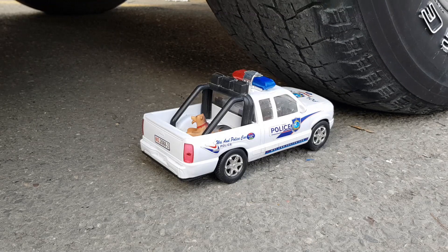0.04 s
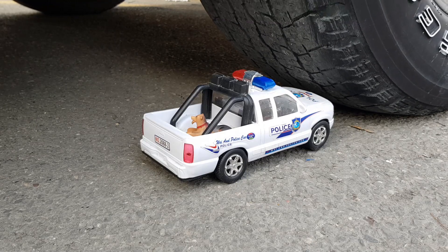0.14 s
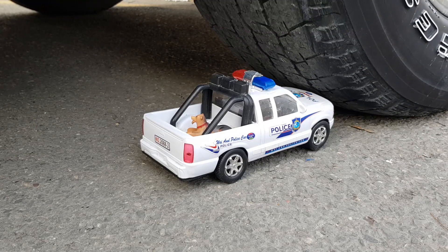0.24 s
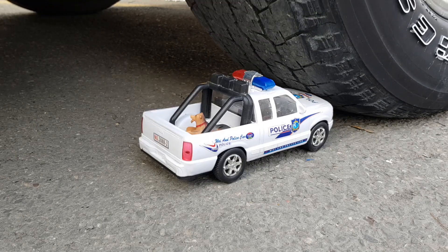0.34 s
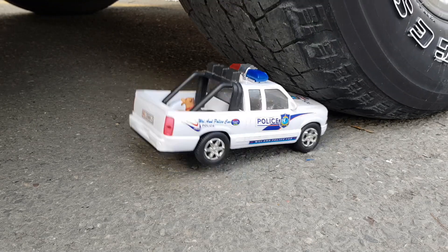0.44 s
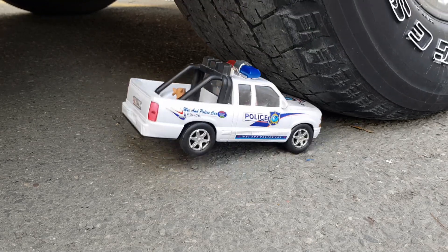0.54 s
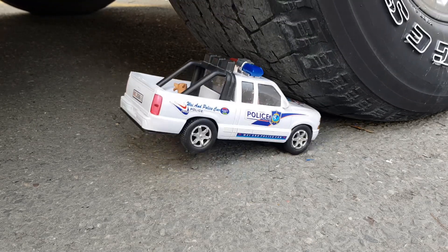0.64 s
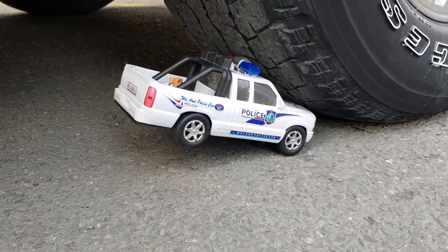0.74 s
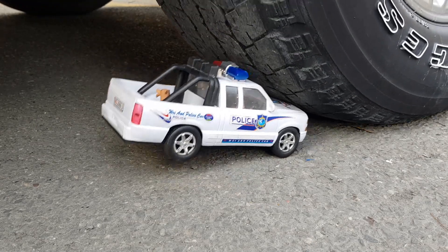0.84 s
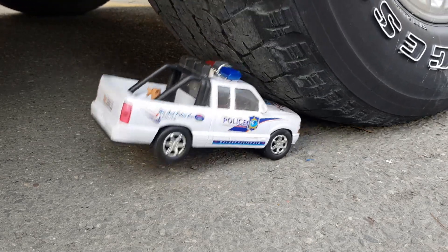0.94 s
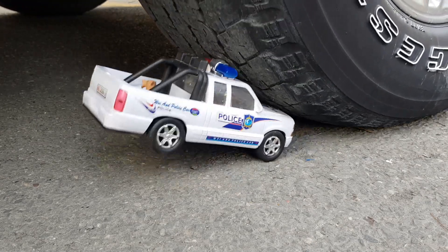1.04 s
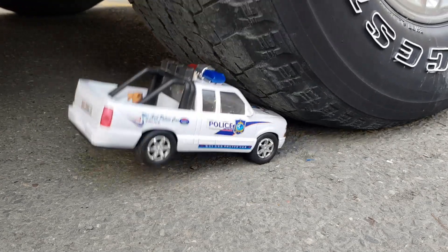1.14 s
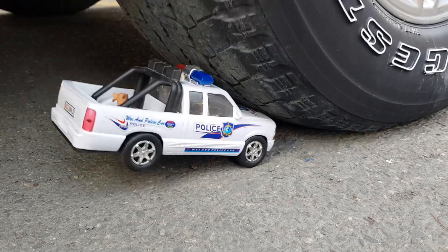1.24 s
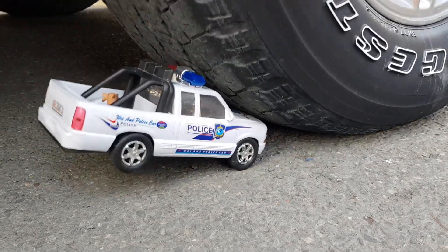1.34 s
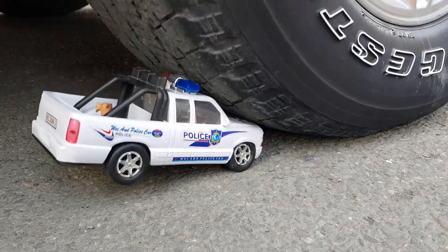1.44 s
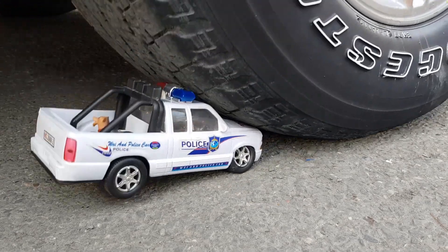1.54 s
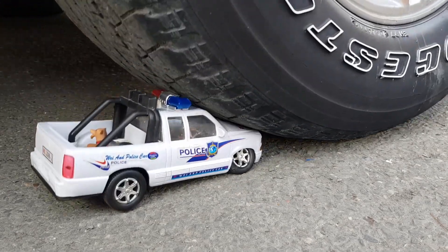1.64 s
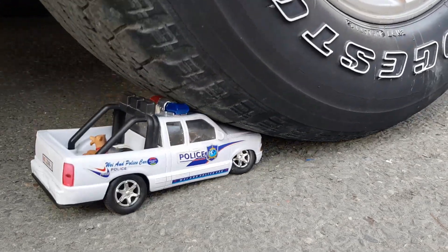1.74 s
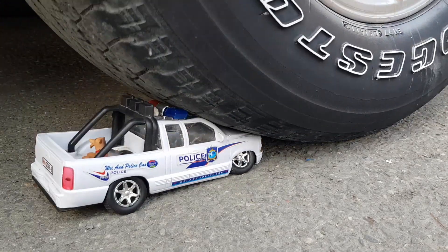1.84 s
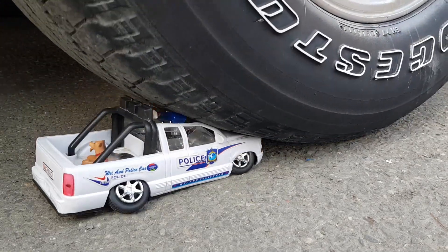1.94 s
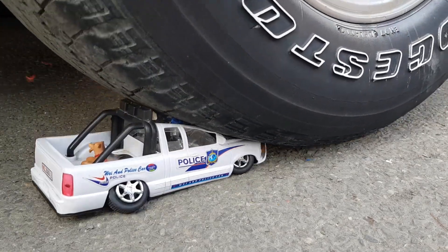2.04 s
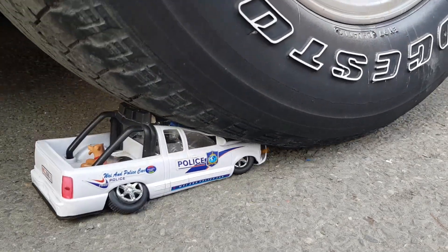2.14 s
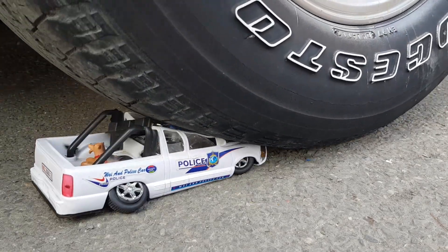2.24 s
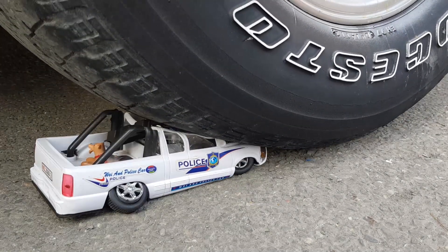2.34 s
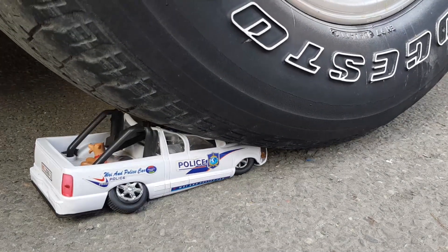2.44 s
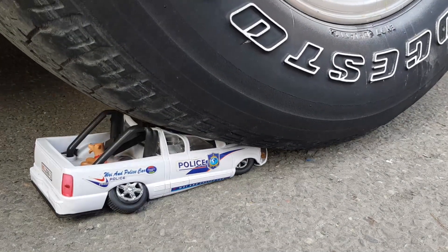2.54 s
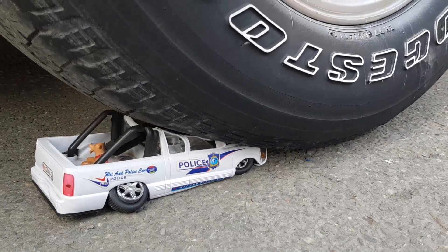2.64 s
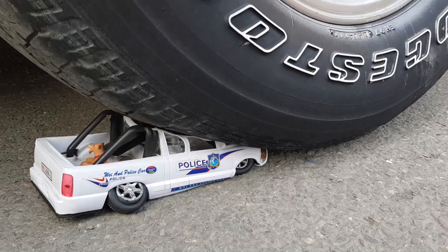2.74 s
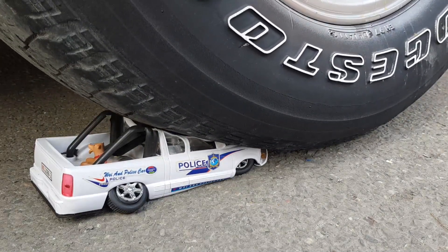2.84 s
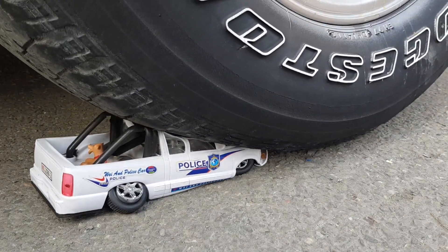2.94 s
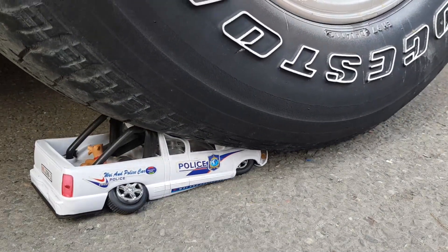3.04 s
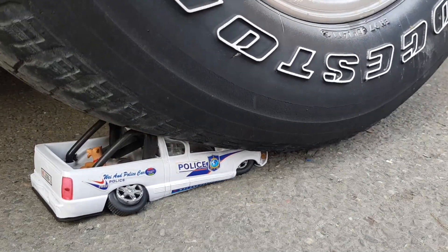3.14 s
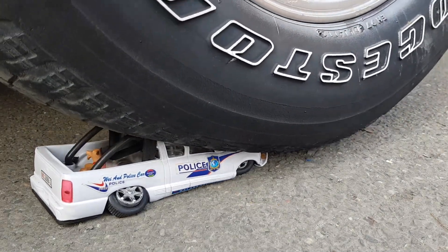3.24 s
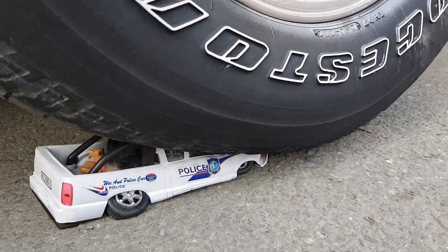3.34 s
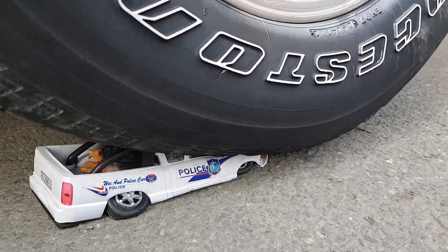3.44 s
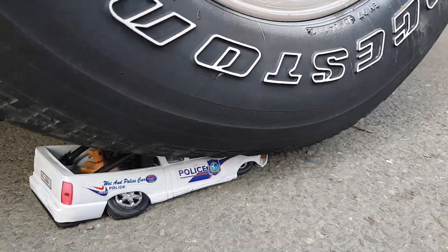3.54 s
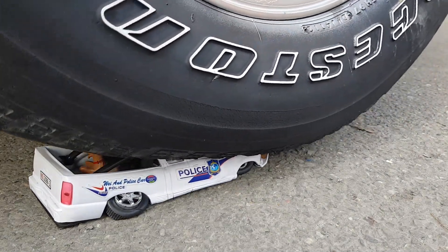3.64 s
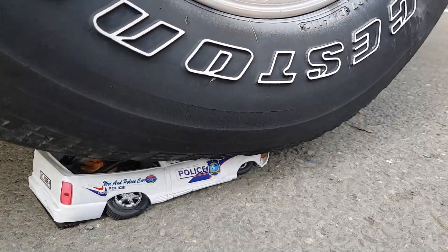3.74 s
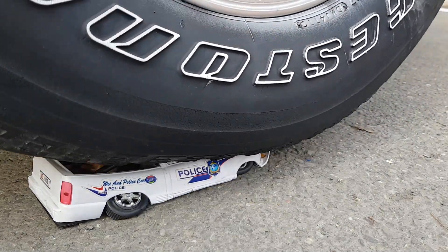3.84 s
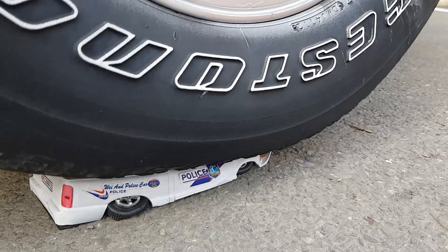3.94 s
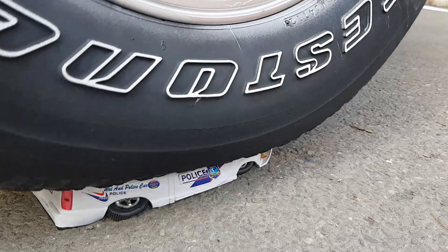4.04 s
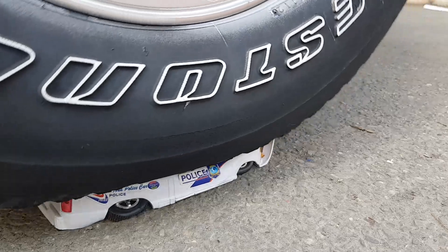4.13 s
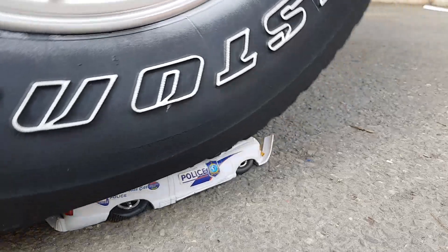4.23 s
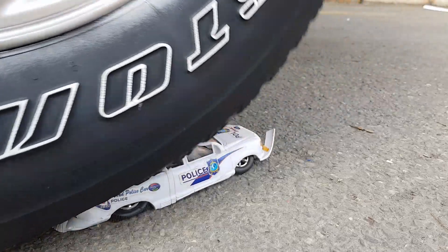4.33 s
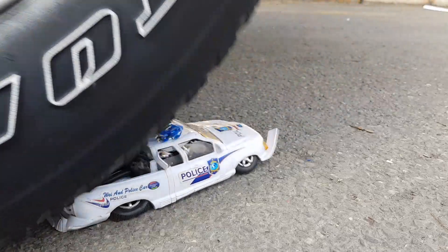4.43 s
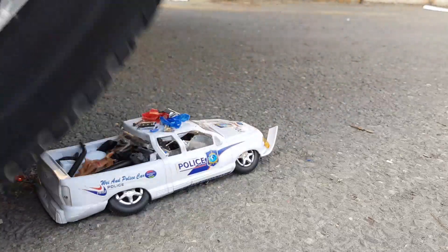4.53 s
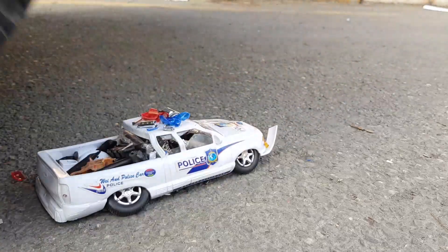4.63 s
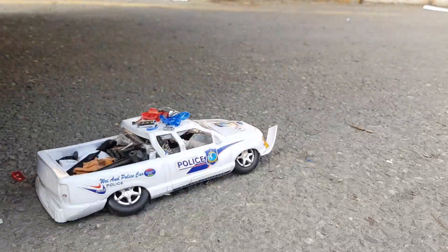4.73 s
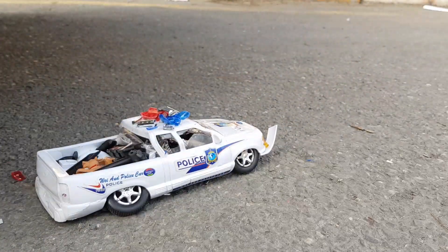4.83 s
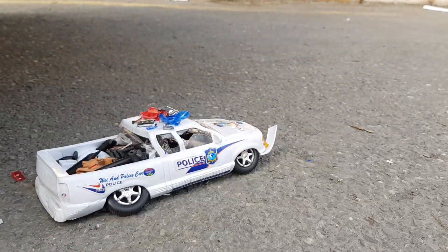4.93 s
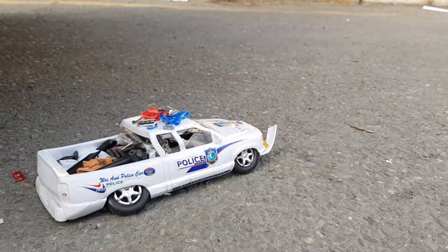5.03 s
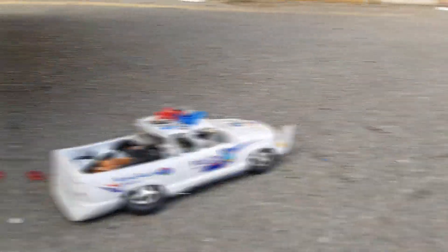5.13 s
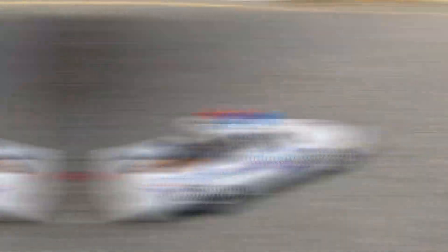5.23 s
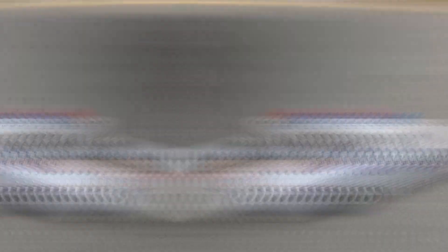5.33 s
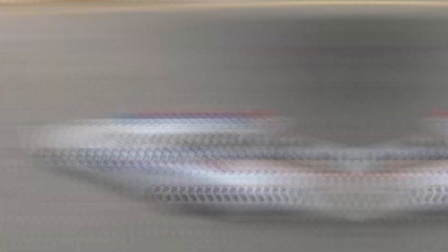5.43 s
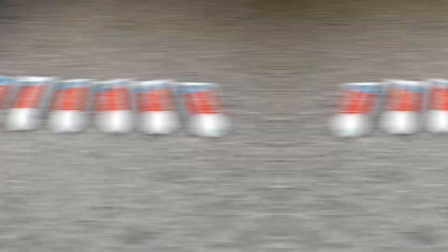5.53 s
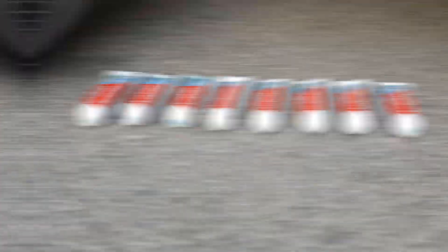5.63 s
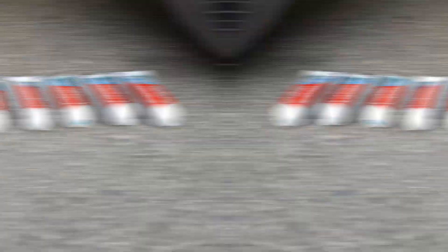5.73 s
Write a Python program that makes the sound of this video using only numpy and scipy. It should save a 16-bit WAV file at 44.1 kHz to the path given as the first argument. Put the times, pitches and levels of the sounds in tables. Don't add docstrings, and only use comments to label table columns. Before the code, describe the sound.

A tyre slowly crushes a hollow plastic toy truck on asphalt, creaking then cracking in sharp snaps over an idling car's rumble.

```python
import sys
import numpy as np
from scipy import signal
from scipy.fft import rfft, irfft, next_fast_len
from scipy.io import wavfile
from scipy.ndimage import uniform_filter1d

SR = 44100
rng = np.random.default_rng(int(sys.argv[2]) if len(sys.argv) > 2 else 0)


def unload_audio(sound):
    columns = np.transpose(np.atleast_2d(sound))
    steps = np.round(np.clip(columns, -1, 1) * 32767)
    wavfile.write(sys.argv[1], SR, steps.astype(np.int16))


def linear_from_db(decibels):
    return 10 ** (np.asarray(decibels, float) / 20)


N = 254752
TIME = np.arange(N) / SR
BREAK = 6000
RUN_UP = 70


def rms_one(x):
    return x / np.sqrt(np.mean(x ** 2) + 1e-20)


def peak_of(x, size):
    return np.sqrt(uniform_filter1d(np.mean(x[:, :500] ** 2, axis=0), size).max())


def at_hz(points, hz):
    point_hz, db = np.transpose(points)
    return np.interp(np.log(np.maximum(hz, 1)), np.log(point_hz), db)


def bins_hz(size):
    return np.arange(size // 2 + 1) * SR / size


def drift(rate):
    r = np.exp(-80 * np.pi * rate / SR)
    slow = signal.lfilter([1], [1, -2 * r, r * r], rng.standard_normal(N // 40 + 2002))[2000:]
    return np.interp(np.arange(N) / 40, np.arange(len(slow)), rms_one(slow))


def resonance(x, hz, width):
    r = np.exp(-np.pi * width / SR)
    poles = [1, -2 * r * np.cos(2 * np.pi * hz / SR), r * r]
    return signal.lfilter([(1 - r * r) / 2, 0, (r * r - 1) / 2], poles, x)


def ring(clicks, hz, t60):
    r, w = linear_from_db(-60 / (t60 * SR)), 2 * np.pi * hz / SR
    return signal.lfilter([0, np.sin(w)], [1, -2 * r * np.cos(w), r * r], clicks + 1e-18)


def strikes(rows):
    out = np.zeros(N)
    for s, db in rows:
        out[round(s * SR)] += linear_from_db(db)
    return out


def coloured(spectrum):
    size = next_fast_len(N)
    white = rfft(rng.standard_normal(size))
    return rms_one(irfft(white * linear_from_db(at_hz(spectrum, bins_hz(size))), size)[:N])


def tones(lines):
    total = np.zeros(N)
    for hz, width, db in lines:
        once = resonance(rng.standard_normal(N), hz, width)
        total += linear_from_db(db) * rms_one(resonance(once, hz, width))
    return total


# start in seconds, snap level in dB,
# shell level in dB, strongest shell mode in Hz, crumbling t60 in seconds.
BONNET = [(1.2235, -48, -25, 1700, 0.039), (1.361, -53, -37, 1820, 0.09), (1.429, -27, -5, 1950, 0.035),
          (1.437, -19, -23, 1800, 0.033), (1.44, -40, -21.5, 644, 0.046), (1.456, -15.5, -13.5, 750, 0.07),
          (1.4663, -13, -19.5, 720, 0.031), (1.479, -35, -21, 690, 0.067),
          (1.526, -37.5, -31.5, 1000, 0.089), (1.5286, -18, -10.5, 1230, 0.053),
          (1.534, -28.5, -22, 1060, 0.11), (1.574, -19.5, -9, 1230, 0.072),
          (1.6499, -20, -11.5, 1060, 0.052), (1.656, -32, -19.5, 1000, .04),
          (1.663, -36, -28.5, 905, 0.089), (1.695, -14.5, -11, 1220, 0.036), (1.712, -22, -5, 1240, 0.027),
          (1.718, -39, -28, 1090, .1), (1.724, -29, -19, 1120, 0.077), (1.743, -18, -17.5, 855, 0.034),
          (1.7884, -12.5, -10.5, 1750, 0.052), (1.8643, -20, -34, 1270, 0.083),
          (1.8734, -15.5, -15, 1240, 0.042), (1.902, -35.5, -46, 940, 0.021),
          (1.915, -14.5, -25, 1230, 0.082), (1.923, -15, -15.5, 1860, 0.078),
          (1.9645, -15, -17, 910, 0.083), (1.9983, -19, -19, 895, 0.037), (2.008, -28, -23, 2120, 0.096),
          (2.0233, -13.5, -11.5, 1370, 0.029), (2.025, -22, -25, 595, 0.02),
          (2.03, -14.5, -11, 1630, 0.081), (2.0505, -16, -30.5, 760, 0.062)]
WINDSCREEN = [(2.0752, -23, -30, 814, 0.055), (2.0856, -17, -9, 420, 0.068),
              (2.0955, -15.5, -15, 905, 0.056), (2.11, -12, -19.5, 1300, 0.056),
              (2.12, -22.5, -38, 1200, 0.027), (2.1797, -13.5, -18, 1500, 0.056),
              (2.1822, -21, -11, 420, 0.023), (2.201, -26.5, -27, 1440, 0.021),
              (2.213, -14, -30.5, 2600, 0.04), (2.235, -15, -24, 646, 0.083),
              (2.252, -30.5, -22.5, 1420, 0.074), (2.2629, -24, -17, 1400, 0.023),
              (2.311, -33, -28.5, 1280, .055), (2.3434, -42, -36, 1470, 0.047),
              (2.35, -27.5, -48.5, 620, 0.043), (2.366, -31.5, -31, 655, 0.066),
              (2.388, -21, -44.5, 1517, 0.043), (2.468, -18.5, -18, 674, 0.046),
              (2.4933, -36, -39.5, 850, 0.078), (2.7572, -18, -39.5, 1370, 0.031),
              (2.801, -43, -62, 2400, .026), (2.818, -46, -58, 2000, .026)]
ROOF = [(2.9584, -11, -21, 970, 0.076), (3.0171, -23.5, -41.5, 620, 0.03), (3.0237, -26, -26.5, 626, 0.047),
        (3.1049, -29.5, -39, 2700, .05), (3.1222, -21, -26.5, 2000, 0.069), (3.1409, -11, -19, 1990, 0.059),
        (3.1663, -25, -21.5, 1250, 0.045), (3.221, -27.5, -59, 360, 0.022), (3.24, -27.5, -34, 800, 0.078),
        (3.255, -14, -17.5, 636, .045), (3.2626, -10.5, -17, 2290, 0.065), (3.262, -32, -17.5, 627, 0.026),
        (3.2659, -11.5, -24, 595, 0.024), (3.2861, -29.5, -32, 2050, 0.036),
        (3.3033, -13, -20, 1940, 0.045), (3.321, -39, -36, 1420, 0.059), (3.345, -30, -35, 1960, .04),
        (3.358, -11, -19, 2700, 0.041), (3.3719, -16, -21, 594, 0.072), (3.3792, -16.5, -11, 646, 0.05),
        (3.3875, -17, -15, 604, 0.051), (3.4261, -20, -19.5, 636, 0.052), (3.4597, -20, -30.5, 546, 0.04),
        (3.4786, -37.5, -37, 603, 0.046), (3.5079, -18, -31, 576, 0.042), (3.527, -15, -20.5, 2500, 0.062),
        (3.5428, -32.5, -34.5, 670, 0.072), (3.5544, -17, -29, 630, 0.038)]
CARGO_BED = [(3.604, -12, -30, 546, 0.04), (3.6186, -17.5, -29.5, 670, 0.046),
             (3.6415, -14.5, -46.5, 624, 0.03), (3.6487, -14, -19, 670, 0.05),
             (3.655, -34.5, -30, 2100, 0.1), (3.681, -30.5, -33, 660, 0.029),
             (3.7522, -38.5, -42.5, 626, .06), (3.7985, -40, -20, 1950, 0.025),
             (3.7978, -13, -17, 645, 0.021), (3.8087, -20.5, -21, 2200, 0.03),
             (3.8198, -28, -40, 2330, 0.021), (3.85, -30, -70, 360, 0.02), (3.864, -41, -70, 360, 0.021),
             (3.8885, -20.5, -33, 1300, 0.12), (3.8965, -19.5, -20, 710, 0.095),
             (3.9035, -22, -30, 620, 0.038), (3.9075, -16, -12.5, 620, 0.055),
             (3.92, -46, -22.5, 2000, 0.082), (3.9682, -33, -49, 370, 0.074),
             (4.0375, -28, -33.5, 650, 0.031), (4.066, -20.5, -30.5, 1400, 0.034),
             (4.098, -45, -42, 410, 0.14)]
TAILGATE = [(4.1243, -37, -22, 605, 0.053), (4.128, -14.5, -16.5, 1410, 0.034),
            (4.132, -53, -27, 576, 0.19), (4.152, -30, -52, 660, 0.027), (4.1595, -17, -23.5, 620, 0.035),
            (4.1764, -15.5, -17, 1410, 0.035), (4.182, -22.5, -32, 700, 0.049),
            (4.192, -20.5, -25, 610, .06), (4.202, -14.5, -11, 726, 0.027), (4.2218, -13, -18, 640, 0.037),
            (4.238, -16, -13, 680, 0.035), (4.2919, -12.5, -26, 620, 0.039), (4.306, -30, -27, 600, 0.092),
            (4.323, -12.5, -23.5, 605, 0.032), (4.3339, -17, -12, 617, 0.052),
            (4.347, -37, -21, 620, 0.045), (4.358, -21.5, -29, 550, 0.029), (4.37, -38, -25, 593, 0.033),
            (4.4113, -26.5, -33.5, 940, 0.021), (4.449, -30, -37.5, 1460, .04),
            (4.47, -40, -38.5, 1030, 0.098), (4.497, -44, -41, 1320, 0.083),
            (4.581, -43.5, -48.5, 1220, 0.095), (4.794, -40, -49, 1260, 0.083)]
# width of its ring as a share of pitch, extra thinness, brightest ring in Hz.
PARTS = [
    (0.39, 0.05, 3800),
    (0.87, 0.032, 4240),
    (0.19, 0.065, 5360),
    (0.22, 0.067, 5700),
    (0.29, 0.27, 5170),
]
CREAKS = [(0.365, -55, -32.5, 800, 0.043), (0.392, -54, -38, 1510, 0.057), (0.409, -55, -33, 1660, 0.037),
          (0.42, -52, -31, 700, .05), (0.456, -44, -33, 1800, .06), (0.462, -54, -29, 1150, 0.082),
          (0.475, -50, -31, 1800, 0.067), (0.5, -32, -25.5, 696, 0.066), (0.5151, -35.5, -31, 1490, 0.077),
          (0.52, -42, -27, 600, 0.15), (0.551, -52, -30, 1690, 0.046), (0.733, -37, -32, 930, .05),
          (0.7453, -40, -24.5, 660, 0.054), (0.809, -60, -32.5, 560, .04), (0.954, -35, -21.5, 714, .06),
          (0.968, -29, -18.5, 900, 0.072), (1.091, -39, -26, 704, 0.057), (1.103, -28, -19, 980, 0.056),
          (1.116, -34, -35, 1090, 0.045), (1.1378, -45, -25, 1000, 0.04), (1.21, -37, -19, 710, 0.074),
          (1.2216, -28, -18.5, 695, 0.07), (1.359, -40, -19.5, 680, 0.11), (1.3835, -48, -33, 900, .06),
          (1.401, -46, -26, 690, .05), (1.4118, -39, -30, 800, .06)]
MORE_CREAKS = [(0.675, -64, -38, 650, 0.054), (0.747, -50, -33, 1600, .05), (0.766, -54, -29.5, 900, 0.046),
               (0.826, -58, -34, 750, .04), (0.893, -60, -32, 650, .06), (0.97, -45, -28.5, 1800, .05),
               (1.265, -55, -37, 800, .05), (1.327, -58, -32.5, 750, 0.086)]
# start in seconds, snap level in dB.
TICKS = [(1.8944, -36), (2.4144, -48), (2.4513, -42), (2.9302, -43), (3.7344, -48), (3.7733, -46),
         (4.0048, -37), (4.0114, -40), (4.0931, -40), (4.1076, -30), (4.1174, -31.5), (3.789, -36)]


def fractures():
    rows = []
    for s, snap_db, shell_db, hz, t60 in CREAKS:
        rows.append((s, snap_db + 0.54, shell_db + 1, hz, t60, .65, .3, 0, 3000))
    for part, own in zip((BONNET, WINDSCREEN, ROOF, CARGO_BED, TAILGATE), PARTS):
        for s, snap_db, shell_db, hz, t60 in part:
            brittle = np.clip(1 - (t60 - 0.071) / 0.059, .1, 1)
            rows.append((s, snap_db + 5.34, shell_db + 1.54, hz, t60, brittle, *own))
    for when, size, pitch in rng.random((14, 3)):
        db = -31.5 - 34 * when - 5.1 * size
        rows.append((4.38 + 0.36 * when, db, db - 3, 500 * 4 ** pitch, .04, .4, .3, 0, 5000))
    for row in MORE_CREAKS:
        rows.append((*row, .3, .35, 0, 3000))
    for s, db in TICKS:
        rows.append((s, db + 2.5, db - 31, 2000, .022, .8, .3, 0, 5200))
    return rows


# start in seconds, ring in Hz, top above 9.5 kHz in dB.
OWN_RINGS = [(0.968, 4500, 2), (1.103, 4400, -2), (1.456, 7170, -1), (1.466, 2510, -10), (1.529, 4420, -7),
             (1.574, 2400, 1), (1.695, 4000, 2), (1.712, 2440, 10), (1.743, 7350, 3), (1.788, 3710, -9),
             (1.873, 7630, 4), (1.923, 5930, -4), (2.05, 4460, -8), (2.086, 2440, 3), (2.11, 5620, 5),
             (2.235, 3260, -4), (2.388, 8430, -5), (2.468, 4700, -2), (2.757, 3990, 3.5), (2.958, 7370, 1),
             (3.122, 6830, -1.5), (3.141, 3270, 4.5), (3.263, 2380, -7), (3.303, 5710, -7),
             (3.358, 2640, 2.5), (3.372, 5630, 5), (3.388, 3960, -4), (3.426, 2730, -1), (3.46, 9000, 6),
             (3.508, 5200, -6), (3.527, 9500, 8), (3.554, 5070, 4), (3.604, 7600, -1), (3.619, 5400, 0.5),
             (3.642, 5630, -4), (3.798, 5300, 3), (3.809, 9290, -7), (4.066, 5710, 0), (4.128, 7160, 0),
             (4.159, 7520, 6), (4.202, 5300, -3), (4.222, 5270, -9), (4.237, 5630, -1), (4.292, 9010, 3),
             (4.323, 8250, 8), (4.794, 8130, -8)]


def own_ring(s):
    near = min(OWN_RINGS, key=lambda row: abs(row[0] - s))
    return near[1:] if abs(near[0] - s) < .0028 else None


def splinters(share, dense):
    size = N + BREAK
    dust = rng.standard_normal((3, size))
    uneven = linear_from_db(3.5 * np.minimum(rng.exponential(1, (3, size)), 2.5))
    grains = uneven * dust * (rng.random((3, size)) < dense)
    lumps = np.zeros(size)
    for spread_db, length in ((3, 60), (2, 240)):
        lumps += spread_db * np.repeat(rng.standard_normal(size // length + 1), length)[:size]
    paths = share * grains[0] + np.sqrt(1 - share ** 2) * grains[1:]
    return rms_one(paths) * linear_from_db(lumps), dust[1:]


def crumble(stock, at, t60, blow):
    t = (np.arange(BREAK) - RUN_UP) / SR
    grains, dust = (x[:, at:at + BREAK] for x in stock)
    rise = linear_from_db(np.minimum(t, 0) * 11000) * np.minimum(np.arange(BREAK) / 10, 1)
    t = np.maximum(t, 0)
    fall = grains * linear_from_db(-60 * t / t60) + dust * linear_from_db(-24 - 60 * t / 0.21)
    return rise * fall + np.roll(blow, RUN_UP, axis=-1)


def snap_burst(burst, listed, bright_hz, thin):
    own = sum(resonance(burst, hz, 0.065 * hz) for hz in 2900 * 5.92 ** rng.random(3))
    bright_hz = bright_hz * 1.187 ** rng.standard_normal()
    if listed:
        own = .4 * own + 2.65 * resonance(burst, listed[0], width=290)
    else:
        own = own + 0.77 * resonance(burst, bright_hz, width=350)
    burst = signal.lfilter([1, -thin], [1], burst + 0.89 * own)
    if listed:
        top = signal.lfilter(*signal.butter(2, 9500, "high", fs=SR), burst)
        burst = burst + (linear_from_db(listed[1]) - 1) * top
    burst[1] = np.roll(burst[1], rng.integers(-3, 5))
    burst[:, -8:] = 0
    return burst


# pitch in Hz, width in Hz, level in dB.
SHELL = [(362, 210, 3), (612.6, 137, 7.5), (830, 170, -8.5), (1260, 60, -2), (1410, 380, -1.5),
         (1790, 1400, 4), (1800, 170, -4.5), (2700, 4200, 1)]


def shell_body(push, hz, width, brittle):
    body = 0
    for k, (mode_hz, mode_width, db) in enumerate(SHELL):
        octaves = abs(np.log2(mode_hz / hz))
        db = db - (4.1 + 5.75 * brittle) * octaves + 2 * rng.standard_normal()
        body = body + linear_from_db(db) * (-1) ** k * resonance(push, mode_hz, mode_width) / np.sqrt(mode_width)
    own = resonance(push, hz, width * hz) / np.sqrt(width * hz)
    return linear_from_db(-2.5) * body + own + 0.015 * resonance(push, 1040, 1300)


# frequency in Hz, level in dB per Hz.
SNAP = [(1060, -43), (1800, -7), (2400, -1), (2980, -3.5), (4320, -3), (5410, -2), (8860, -6.5),
        (11700, -1), (15400, -8.5), (16700, -21), (17100, -47)]
# frequency in Hz, left minus right in dB.
SNAP_LEAN = [(2000, 6.5), (5000, 6.5), (9500, 1), (12500, 11)]


def toy_shell():
    snap, modes = np.zeros((2, 2, N + BREAK))
    t = np.arange(BREAK) / SR
    bright, dull = splinters(share=0.24, dense=0.31), splinters(share=0.87, dense=.25)
    for s, snap_db, shell_db, hz, t60, brittle, width, thin, bright_hz in fractures():
        at = round(s * SR) - 8 - RUN_UP
        span = slice(at, at + BREAK)
        lean = linear_from_db(rng.normal(0, 1) * np.array([[1], [-1]]))
        signs = rng.choice([-1, 1], (3, BREAK))
        tear = (0.88 * signs[0] + 0.45 * signs[1:]) * linear_from_db(-5 + 18.55 * brittle - 60 * t / 0.011)
        thin = np.clip(thin + (snap_db - shell_db - 10.5) / 25, -.8, .9)
        burst = snap_burst(crumble(bright, at, t60, blow=tear), own_ring(s), bright_hz, thin)
        snap[:, span] += linear_from_db(snap_db + 2) * lean * burst / peak_of(burst, size=40)
        jolt = signs[0, 0] * linear_from_db(6.5 + 13.64 * brittle - 60 * t / 0.00043)
        body = shell_body(crumble(dull, at, 1.32 * t60, blow=jolt), hz, width, brittle)
        modes[:, span] += linear_from_db(shell_db - 3) * lean * body / peak_of(body, size=80)
    size = next_fast_len(N + BREAK)
    hz = bins_hz(size)
    colour = linear_from_db(at_hz(SNAP, hz) + at_hz(SNAP_LEAN, hz) * np.array([[.5], [-.5]]))
    snap = irfft(rfft(snap, size) * colour, size)[:, :N]
    modes = signal.sosfilt(signal.butter(2, 280, "high", fs=SR, output="sos"), modes)
    for layer in (snap, modes):
        layer[1] = np.roll(layer[1], 6)
    return snap + modes[:, :N] * linear_from_db([[2.8], [-2.8]])


# start in seconds, level in dB, pitch in Hz, t60 in seconds.
THUMPS = [(2.086, -17.5, 120, 0.038), (2.26, -33, 70, 0.14), (2.962, -23, 62.5, 0.11),
          (3.263, -21.5, 133, 0.043), (3.373, -30, 189, 0.12), (3.904, -14.5, 95.4, 0.12),
          (2.96, -29, 360, 0.046), (2.8, -32.5, 370, 0.068), (3.909, -20, 310, 0.056),
          (3.1, -33, 332, 0.035), (3.991, -29, 81, 0.3), (4.126, -11, 62, 0.084), (4.129, -9, 310, 0.012),
          (4.336, -30, 130, 0.034), (4.335, -13, 340, 0.038)]
# start in seconds, level in dB.
TWANGS = [
    (2.09, -33.5),
    (3.906, -33.5),
    (4.333, -33.5),
]
# pitch in Hz, level in dB, t60 in seconds.
SPRING = [(188.6, -9, 2.38), (353, -2.5, 0.5)]


def thumps():
    low = sum(ring(strikes([(s, db)]), hz, t60) for s, db, hz, t60 in THUMPS)
    low = signal.sosfilt(signal.butter(2, 36, "high", fs=SR, output="sos"), low)
    soft = signal.lfilter([.07], [1, -.93], low)
    spring = sum(linear_from_db(db) * ring(strikes(TWANGS), hz, t60) for hz, db, t60 in SPRING)
    return (soft + spring) * linear_from_db([[2.6], [-3.6]])


# start in seconds, peak level in dB.
CHIP = [
    (4.7174, -35),
    (4.7198, -55),
    (4.9352, -46.5),
    (5.0784, -68),
    (5.0933, -47),
    (5.1114, -51.5),
    (5.181, -61.5),
    (5.2124, -53.5),
]
# pitch in Hz, level in dB, t60 in seconds.
CHIP_MODES = [(11000, -1.5, 0.056), (11800, -12, 0.058), (13600, -19, 0.014)]


def chip():
    ticks = strikes(CHIP)
    rings = sum(linear_from_db(db - 3) * ring(ticks, hz, t60) for hz, db, t60 in CHIP_MODES)
    return (rings + 0.08 * ticks) * linear_from_db([[4], [-6]])


# frequency in Hz, left-right likeness from 0 to 1.
LIKENESS = [(60, 0.89), (130, 0.9), (290, 0.94), (640, 0.94), (1400, 0.18), (15000, 0.17)]
# frequency in Hz, left minus right in dB.
LEAN = [(60, 6.5), (1300, 6.5), (4400, 7), (15000, 15.5)]


def two_ports(near, other, lag):
    size = next_fast_len(N)
    hz = bins_hz(size)
    alike, lean = at_hz(LIKENESS, hz), linear_from_db(at_hz(LEAN, hz) / 2)
    left = rfft(near, size)
    late = left * np.exp(-2j * np.pi * hz * lag / SR)
    right = (alike * late + np.sqrt(1 - alike ** 2) * rfft(other, size)) / lean
    return np.array([irfft(left * lean, size)[:N], irfft(right, size)[:N]])


# time in seconds, gain in dB.
GAIN = [(0, -0.5), (.9, 0), (1.45, -1), (1.65, -10.5), (2.1, -9.5), (2.5, -20.5), (2.9, -14), (3.7, -16.5),
        (4.05, -7.5), (4.5, -12), (4.7, -17.5), (5.0, -21.5), (5.78, -27)]
# pitch in Hz, width in Hz, level in dB.
IDLE_TONES = [(52.7, 13, 1), (124.6, 16, -6.5)]
# frequency in Hz, level in dB per Hz.
RUMBLE = [(15, -44), (25, -32.5), (48, 0), (110, -5), (315, -17), (533, -20), (900, -31.5), (1170, -72.5),
          (1980, -120)]
# frequency in Hz, level in dB per Hz.
HISS = [(410, -34), (700, 2), (899, 1), (1330, -1.5), (2450, -1.5), (3490, -6.5), (7020, -11.5),
        (8110, -20), (11900, -14.5), (15300, -21.5), (16300, -9.5)]


def engine_hiss():
    hiss = coloured(HISS) * linear_from_db(1.2 * drift(25))
    treble = signal.sosfilt(signal.butter(2, 5000, "high", fs=SR, output="sos"), hiss)
    lifted = hiss + (linear_from_db(3) - 1) * treble
    return signal.sosfilt(signal.cheby2(10, 40, 16300, fs=SR, output="sos"), lifted)


def idling_car():
    gain_db = np.interp(TIME, *np.transpose(GAIN))
    tone_db = -46.5 + 0.64 * gain_db
    rumble_db = -33 + 0.86 * gain_db
    hiss_db = -43.5 + gain_db
    whine_db = -52.5 + 0.93 * gain_db
    tone_db = tone_db + np.interp(TIME, [0, 0.299, 1.45, 1.651], [-51, 9, 13, 0])
    whine_db = whine_db - np.interp(TIME, [.85, 1.0, 2.9, 3.3], [1, 5, 1, 11])
    flutter = linear_from_db(whine_db + 1.7 * drift(24) + 1.3 * drift(3))
    paths = []
    for port in range(2):
        path = linear_from_db(tone_db) * tones(IDLE_TONES)
        path += flutter * tones([(2435, 105, 0)])
        path += linear_from_db(rumble_db) * coloured(RUMBLE)
        path += linear_from_db(hiss_db) * engine_hiss()
        paths.append(path)
    return two_ports(*paths, lag=21)


# frequency in Hz, level in dB per Hz.
NEXT_CAR = [(18, -42), (30, -8.5), (60, -5.5), (121, -9), (418, -27.5), (589, -21), (852, -27.5),
            (922, -29.5), (1140, -29.5), (6650, -43), (8220, -41), (10700, -48.5), (13200, -46),
            (16300, -61.5)]
# pitch in Hz, width in Hz, level in dB.
NEXT_TONES = [(70.2, 6, -2), (105.8, 26, -1.5), (935, 29, -19.5), (4130, 100, -29), (6350, 60, -28.5),
              (8010, 870, -20)]


def next_car():
    start_s, top_db = 5.082, -39
    fade = np.clip((TIME - start_s) / (N / SR - start_s), 0, 1)
    sound = linear_from_db(top_db) * fade * (coloured(NEXT_CAR) + tones(NEXT_TONES))
    return sound * linear_from_db([[.1], [-.1]])


def scene():
    return toy_shell() + thumps() + chip() + idling_car() + next_car()


def band_limit(x):
    return signal.sosfilt(signal.butter(12, 17020, fs=SR, output="sos"), x)


def record(dry):
    rounded = .9 * np.tanh(dry / .9)
    cut = signal.sosfilt(signal.cheby2(14, 80, 17300, fs=SR, output="sos"), rounded)
    return band_limit(cut)


dry = scene()
out = record(dry)
unload_audio(out)
```